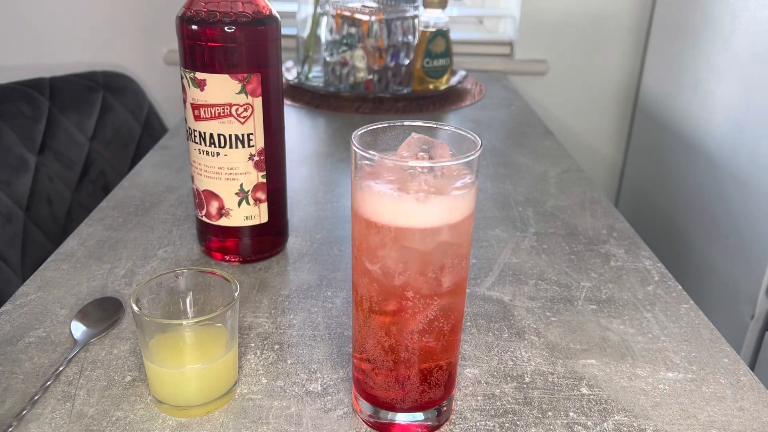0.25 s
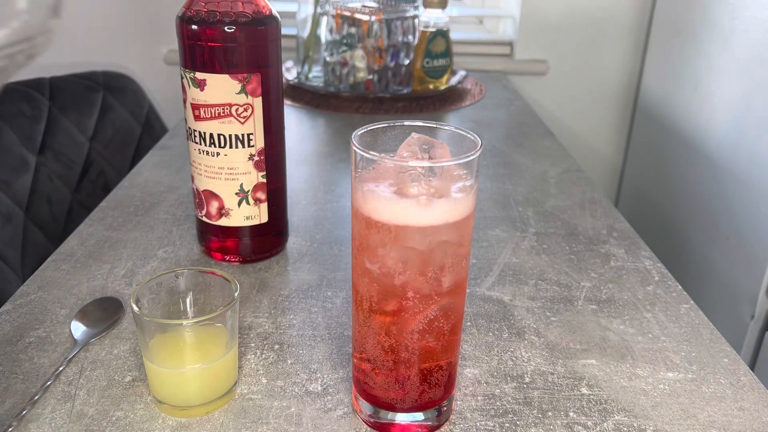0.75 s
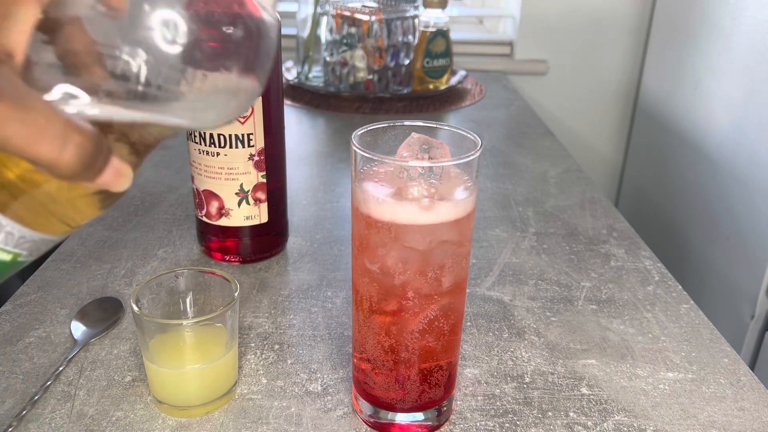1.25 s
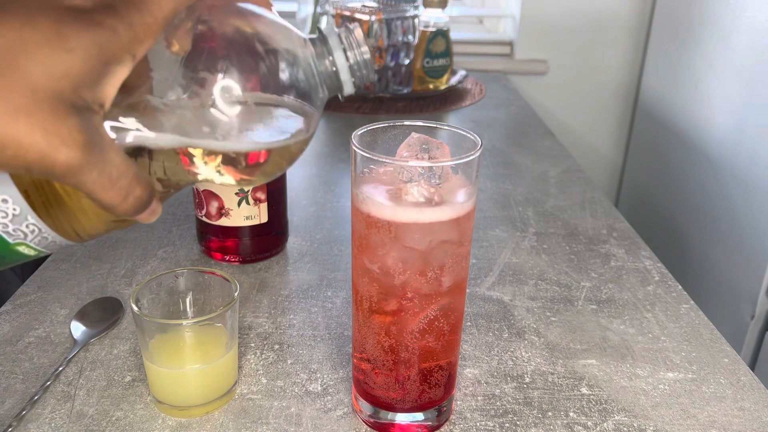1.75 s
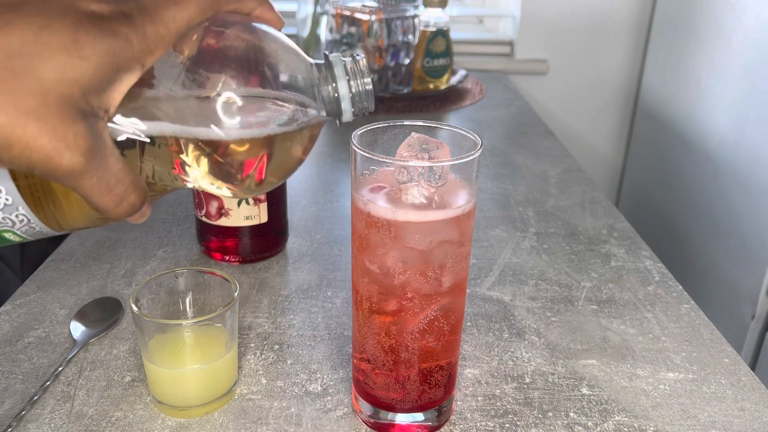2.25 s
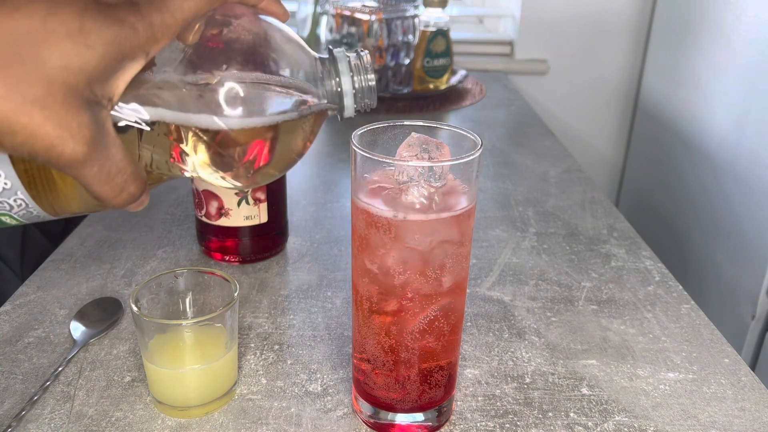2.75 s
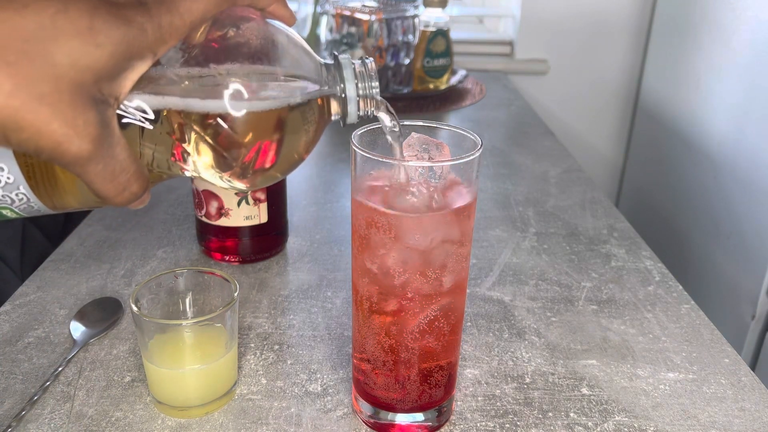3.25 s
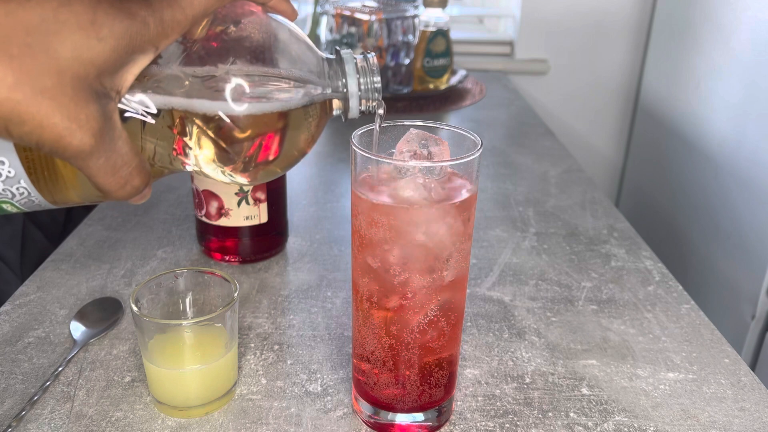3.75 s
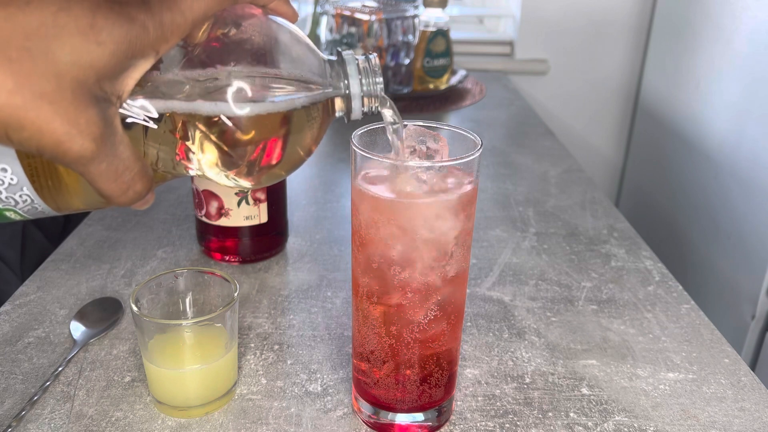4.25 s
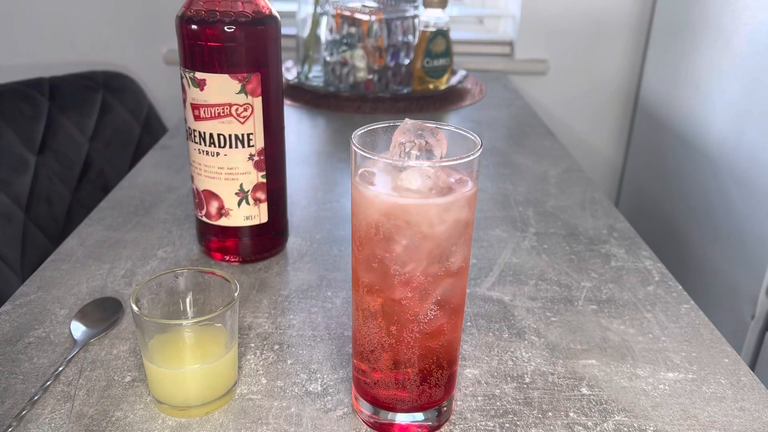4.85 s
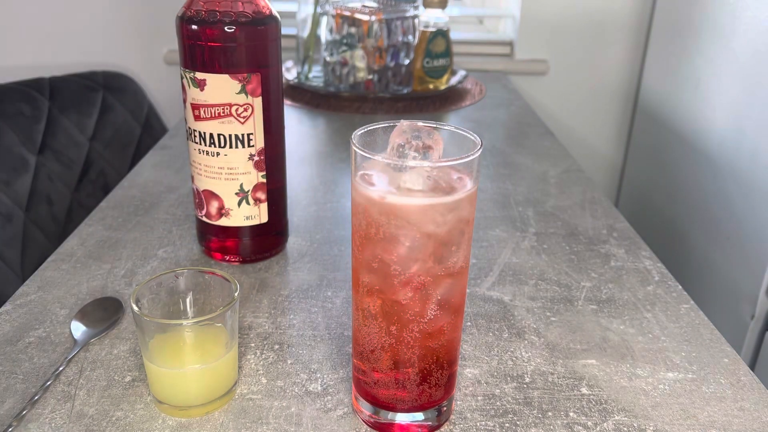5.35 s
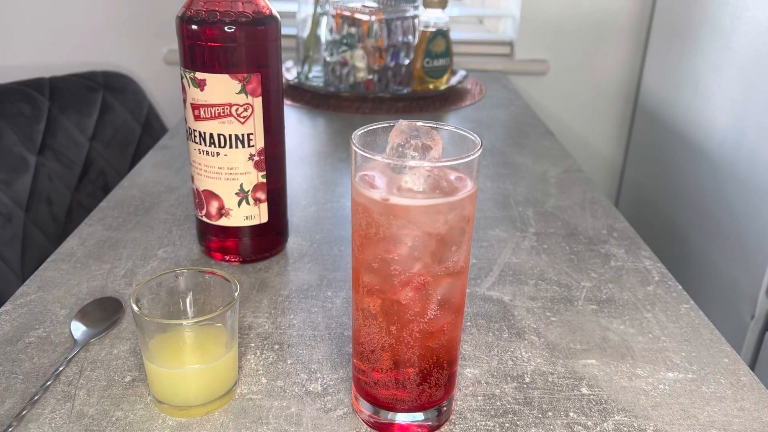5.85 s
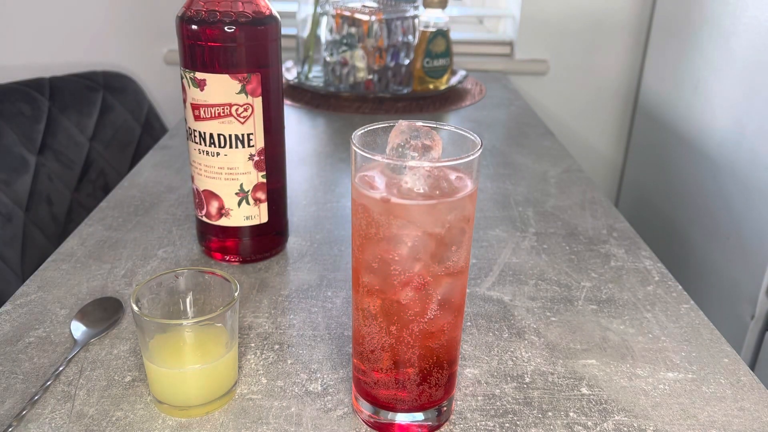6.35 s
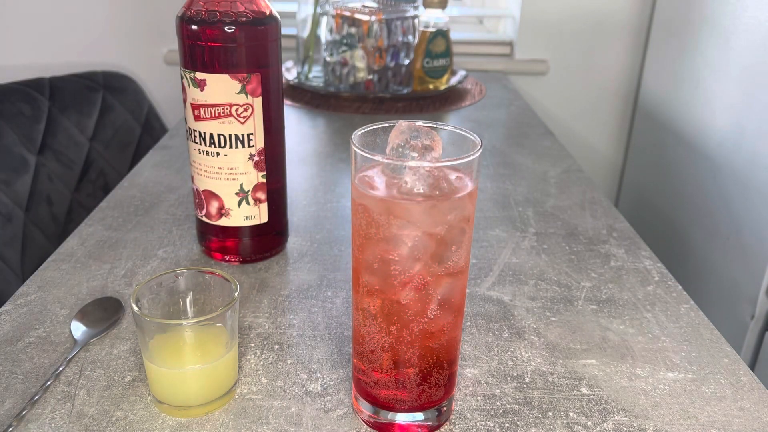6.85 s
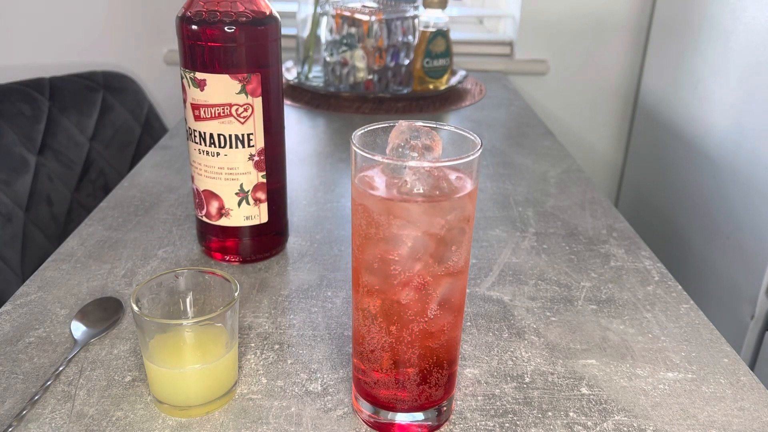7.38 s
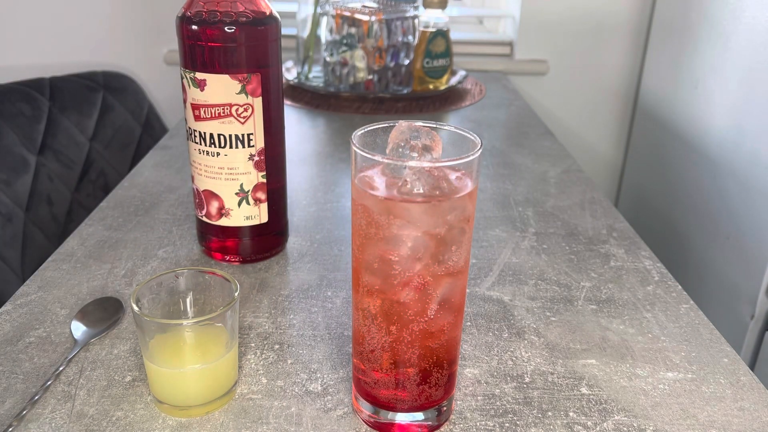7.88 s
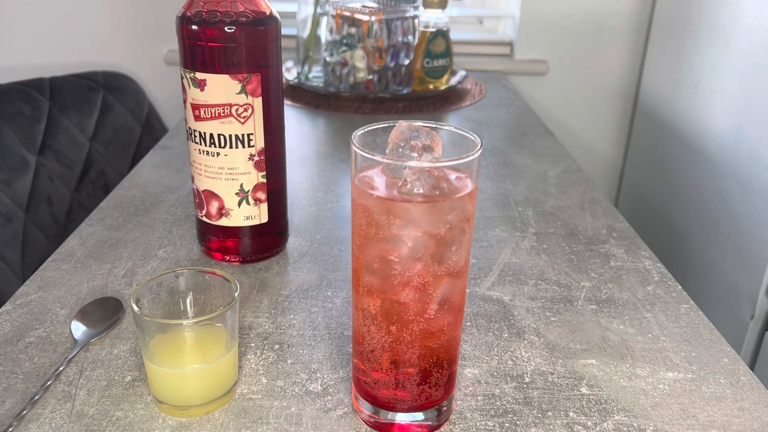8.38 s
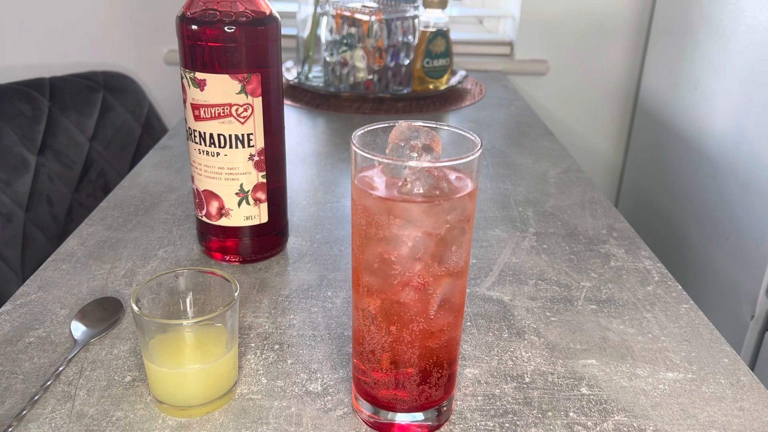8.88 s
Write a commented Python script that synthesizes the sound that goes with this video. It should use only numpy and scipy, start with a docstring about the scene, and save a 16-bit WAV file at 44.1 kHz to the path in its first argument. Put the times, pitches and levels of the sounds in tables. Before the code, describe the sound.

A small kitchen, close stereo microphone, faint fridge hum and low rumble throughout. From 0 to 0.9 s a thin plastic bottle at left crinkles and ticks, with hollow low notes, over already lively fizz. The foam hiss swells to its fullest around 1.5 to 2.5 s, wide and grainy, its brighter part lingering, then sinks. About 3.1 to 3.6 s there are small crackles and quick, quiet bubbly gulps, with a few faint ones up to 4.7 s. Fizz rises again, softer, peaking near 5.2 s and fading slowly. A sharp plastic buckle cracks at 5.3 s, followed by scattered crinkles. From 6.7 s the crackling thickens; knocks at 7.2 to 7.8 s lead to the loudest hard clack at 7.9 s, with more at 8.0, 8.2 and 8.3 s, echoing briefly. Lighter ticks at 8.5 to 8.8 s, then thin residual fizz and hum until about 9.1 s.

```python
"""A fizzy hiss swells and sinks while plastic crackles, rustles and knocks to the left, over hum and rumble.
A drink is poured into a glass on a kitchen counter: random clicks of bursting foam fizz in several pitch bands.
The bottle adds crackles (struck resonances), rustle (dense slips), short clear notes, booms of its air and gulps.
The bottle's crackles, rustle, notes and gulps echo off the walls; one overall tone shapes everything."""
import sys
import numpy as np
from scipy import signal
from scipy.fft import rfft, irfft, next_fast_len
from scipy.io import wavfile
from scipy.ndimage import uniform_filter1d

SR = 44100
rng = np.random.default_rng(int(sys.argv[2]) if len(sys.argv) > 2 else 0)


def to_wav(sig):
    """Store sig (one row per channel, or 1-D mono) as 16-bit WAV at the path in sys.argv[1].

    Samples outside -1..1 are clipped; the rate is SR.
    """
    pcm = np.clip(np.atleast_2d(sig), -1, 1) * 32767
    pcm = np.round(pcm).astype(np.int16)
    wavfile.write(sys.argv[1], SR, pcm.T)  # frames by channels


N = 402191  # length in samples


def gain_of(db):
    """Turns decibels into a factor."""
    return 10 ** (np.asarray(db) / 20)


def evened(x):
    """Scales a sound to an average (RMS) level of 1."""
    return x / np.sqrt(np.mean(x ** 2) + 1e-20)


def peaked(x):
    """Scales a sound to a peak of 1."""
    return x / abs(x).max()


def read(points, hz):
    """Reads a curve between its points, on a pitch scale that is close to logarithmic."""
    point_hz, value = np.transpose(points)
    return np.interp(np.log(hz + 1), np.log(point_hz + 1), value)


def along(rows):
    """Reads a curve over time at every sample."""
    s, value = np.transpose(rows)
    return np.interp(np.arange(N) / SR, s, value)


def shaped(x, response):
    """Filters by a response given as a function of Hz."""
    size = next_fast_len(x.shape[-1] + 4096)
    spectrum = rfft(x, size) * response(np.fft.rfftfreq(size, 1 / SR))
    return irfft(spectrum, size)[..., :x.shape[-1]]


def resonate(x, hz, width):
    """A resonance of gain 1: shifts the pitch hz down to zero, smooths, and shifts back."""
    turn = np.exp(2j * np.pi * np.cumsum(hz * np.ones(x.shape[-1])) / SR)
    r = np.exp(-np.pi * width / SR)
    smooth = signal.lfilter([1 - r], [1, -r], x / turn)
    return 2 * (turn * smooth).real


def pops(per_s, spread_db):
    """Random clicks of either sign, a few of them large."""
    chance = rng.random(N)
    size = np.minimum(rng.exponential(1, N), 5)
    sign = rng.choice([-1., 1.], N)
    return sign * gain_of(spread_db * size) * (chance < per_s / SR)


def swells(full_at, hold, db, rise_s, t60):
    """Summed level of events that rise 20 dB in rise_s up to full_at, hold, and fall 60 dB in t60."""
    t = np.arange(0, N + 16, 16) / SR  # every 16th sample is enough
    since = t - np.array(full_at)[:, None]
    t60 = (np.ones(len(full_at)) * t60)[:, None]
    past_hold = np.maximum(since - np.array(hold)[:, None], 0)
    rise_db = 20 * np.minimum(since, 0) / rise_s
    level = gain_of(np.array(db)[:, None] + rise_db - 60 * past_hold / t60)
    return np.interp(np.arange(N) / SR, t, level.sum(0))


def ports(x, balance, turn):
    """One source at the two ports: a level difference and a phase lead that depend on pitch."""
    def half(hz):
        lead = np.interp(hz, *np.transpose(turn))  # radians
        return gain_of(read(balance, hz) / 2) * np.exp(.5j * lead)
    return np.array([shaped(x, half), shaped(x, lambda hz: 1 / half(hz))])


def spread(a, b):
    """A wide source: a shared part in front and a part that differs between the ports."""
    # how alike the two ports hear it: (pitch [Hz], likeness [0-1 after limiting])
    likeness = [(60, 0.86), (130, 0.65), (290, 0.83), (640, -0.022), (1410, 1), (3100, -0.076),
                (6820, 0.59), (15000, 0.29)]
    # left minus right: (pitch [Hz], level [dB])
    front_db = [(60, 5), (110, 1.5), (200, 5), (380, 2), (700, 2.5), (1290, 2.5), (2380, 0.5), (4400, 7.5),
                (8120, 2.5), (15000, -2)]
    # phase lead of left over right: (pitch [Hz], lead [radians])
    front_turn = [(0, 0), (2580, 0.8), (3190, 2.0), (3960, 0.4), (5250, 7.3), (7750, 7.0), (10900, 2.3),
                  (11500, 0.0), (12700, -0.1), (13200, -3.0), (14400, -3.5), (15600, -7.1)]

    def same(hz):
        return np.clip(read(likeness, hz), 0, .99)

    def apart(hz):
        return np.sqrt(1 - same(hz)) * gain_of(np.outer([.5, -.5], read(front_db, hz)))
    shared = ports(shaped(a, lambda hz: np.sqrt(same(hz))), front_db, front_turn)
    return shared + shaped(b, apart)


def foam():
    """Fizz of bursting foam in several pitch bands, as the glass's air might ring, with little bass."""
    # bands lowest, second, third, fourth, fifth, widest treble, broad; curves below move the first three:
    # (pitch [Hz], width of each filter pass [Hz], clicks [per s], steady fizz before it goes flat [dB])
    bands = [(1950, 925, 7500, -79), (3240, 1200, 8300, -72), (5150, 860, 12000, -70),
             (6530, 530, 14000, -74), (8360, 1100, 20000, -66), (12960, 19000, 28000, -70.5),
             (3880, 7300, 29000, -73)]
    # heads of foam that swell and sink: (peak time of the lowest band [s], delay [s per octave of pitch],
    # time to swell 6 dB [s], time to sink 6 dB [s], peak level of each band [dB])
    heads = [(0.2, 0.51, 1, 0.8, (-58.5, -61, -88, -73, -85, -67, -58)),
             (1.75, 0.85, 0.8, 0.82, (-50.5, -58, -62.5, -69.5, -65.5, -56.5, -58)),
             (5.2, 0.03, 0.85, 1.17, (-59, -60.5, -65.5, -87, -76.5, -67, -50.5))]
    # pitch of the lowest band: (time [s], pitch [Hz])
    lowest_hz = [(0, 1870), (.6, 1650), (1.3, 1450), (1.9, 1660), (2.5, 1740), (3.7, 1950), (9.12, 1990)]
    # pitch of the second band: (time [s], pitch [Hz])
    second_hz = [(0, 3500), (1.0, 3300), (1.7, 3100), (2.7, 3400), (3.7, 3550), (4.6, 3500), (9.12, 3500)]
    # pitch of the third band: (time [s], pitch [Hz])
    third_hz = [(0, 5300), (2.2, 5300), (2.7, 5200), (3.3, 5430), (9.12, 5460)]
    # change of the steady fizz: (time [s], level [dB])
    going_flat = [(0, 0.5), (6.3, 6.5), (6.95, -3), (7.5, -3.5), (9.12, -11)]
    # part of the fizz that reaches lower: (time [s], share [0-1])
    deeper_share = [(0, 0.7), (1.0, 1), (1.5, 0.86), (2.3, 0), (3.1, .03), (4.3, 0.2), (5.2, 0.46),
                    (9.12, .2)]

    t, flat_db = np.arange(N) / SR, along(going_flat)
    moving_hz = [along(curve) for curve in (lowest_hz, second_hz, third_hz)]
    out = np.zeros((3, N))  # three independent layers, for width
    for k, (hz, width, per_s, steady_db) in enumerate(bands):
        octaves = np.log2(hz / bands[0][0])
        power = gain_of(steady_db + flat_db) ** 2
        for peak_s, lag, swell_s, sink_s, peak_db in heads:
            late = t - peak_s - lag * octaves
            bell_db = -6 * (late / np.where(late < 0, swell_s, sink_s)) ** 2
            power += gain_of(peak_db[k] + bell_db) ** 2
        if k < len(moving_hz):
            hz = moving_hz[k]
        # the difference between samples favours treble
        clicks = np.diff([pops(per_s, 3.2) for _ in out], prepend=0)
        fizz = evened(resonate(resonate(clicks, hz, width), hz, width))
        # patches of foam burst together
        seethe = evened(uniform_filter1d(rng.standard_normal(N), size=3000))
        out += np.sqrt(power) * gain_of(0.58 * seethe) * fizz

    def above(edge_hz):
        return shaped(out, lambda hz: 1 / np.sqrt(1 + (edge_hz / (hz + 1)) ** 12))
    deeper = np.clip(along(deeper_share), 0, 1)
    out = deeper * above(800) + (1 - deeper) * above(1260)  # bass cuts, Hz
    return spread(out[0], out[1:])


def kitchen():
    """Steady room noise, low rumble that comes and goes, and a wavering fridge hum."""
    # colour of the room noise, before its overall level is set: (pitch [Hz], level [dB per Hz])
    room_tone = [(15, -48), (25, -21), (53, 6), (72, -12), (205, -6), (242, -8.5), (393, -15.5),
                 (573, -21.5), (711, -22.5), (836, -22.5), (1100, -28.5), (1600, -23.5), (7660, -26),
                 (10600, -58), (14600, -23.5), (15900, -50.5)]
    # steps and shakes of the counter: (time at full level [s], level [dB])
    shakes = [(.02, -45.5), (.35, -52.5), (.84, -56), (1.17, -55), (1.38, -71), (1.55, -62), (2.94, -61),
              (3.89, -60), (4.58, -53.5), (5.05, -51), (5.32, -44), (5.41, -60), (5.56, -54.5),
              (5.76, -52.5), (6.1, -57), (6.4, -53.5), (6.73, -59.5), (7.21, -49.5), (7.34, -45),
              (7.57, -52.5), (7.92, -45.5), (8.05, -50.5), (8.23, -69), (8.66, -45), (8.76, -58)]
    # fridge tones, before the swelling below: (pitch [Hz], level [dB], width of the waver [Hz])
    hum = [(99, -70.5, 2.8), (199.5, -68, 4.7)]
    # the hum swells and dips: (time [s], level [dB])
    hum_level = [(0, 3), (.9, -0.5), (1.2, -1.5), (2.0, 1.5), (2.5, -12.5), (2.9, 2), (3.7, -3.5),
                 (4.1, -4), (4.5, 1), (6, -0.5), (8.2, -4), (9.12, -4.5)]

    air, shake, buzz = rng.standard_normal((3, 3, N))
    out = gain_of(-63) * evened(shaped(air, lambda hz: gain_of(read(room_tone, hz))))
    s, db = np.transpose(shakes)
    steady = gain_of(-67.5)
    level = steady + swells(s, 0 * s, db, rise_s=0.063, t60=0.47)
    out += level * evened(resonate(resonate(shake, 64, 110), 80, 280))
    swell_db = along(hum_level)
    for hz, db, width in hum:
        tone = np.sqrt(2) * np.sin(2 * np.pi * hz * np.arange(N) / SR)
        waver = 0.67 * evened(resonate(buzz, hz, width))
        out += gain_of(db + swell_db) * (tone + waver)
    return spread(out[0], out[1:])


def rustle():
    """Dense small slips of skin on plastic: a body coloured by the bottle and a thin squeaky top."""
    # the hand drags and twists the plastic:
    # (time at full level [s], hold [s], level [dB], time to fall 60 dB [s], treble relative to the body [dB])
    drags = [(0.029, .003, -51, 0.21, -1), (0.115, 0.0035, -54.5, 0.1, 2), (0.15, 0.24, -69, 0.18, 1),
             (0.364, 0.11, -61, 0.14, 4), (0.506, 0.032, -59, .05, 5), (0.547, .002, -44, 0.14, -7),
             (0.882, 0.0022, -62, 0.36, 11), (3.22, .003, -59, 0.53, -25), (3.317, 0.03, -57, 0.16, -25),
             (5.042, 0.074, -54, 0.091, -13), (5.338, 0.0018, -35.5, 0.045, -4),
             (5.342, 0.023, -73, .05, 4), (5.385, .003, -60, 0.097, -6), (5.509, 0.047, -49.5, 0.13, -18),
             (5.567, 0.0039, -38, 0.042, -29), (5.665, 0.0023, -48, 0.078, -9), (5.695, 0.063, -63, .1, -3),
             (5.753, 0.097, -62, 0.11, -15), (5.93, .004, -53.5, .12, -10),
             (6.055, 0.011, -56.5, 0.068, -18), (6.08, 0.0018, -50, 0.026, -27), (6.093, .04, -74, .1, -15),
             (6.237, 0.026, -65, .1, -15), (6.311, .005, -52, 0.16, -19), (6.424, .004, -53.5, 0.19, -18),
             (6.684, 0.004, -43, 0.08, -25), (6.745, .003, -49, 0.086, -21),
             (7.013, 0.036, -57.5, 0.15, -27), (7.076, 0.1, -58, 0.09, -9), (7.198, 0.008, -44, 0.065, -15),
             (7.313, .004, -41.5, 0.36, -18.5), (7.399, 0.0034, -43.5, 0.15, -10),
             (7.541, 0.002, -43, 0.059, -12), (7.561, 0.0026, -34.5, 0.059, -16),
             (7.674, 0.0033, -50.5, 0.25, -15), (7.736, 0.1, -48, 0.28, -28.5),
             (7.916, 0.0072, -37, 0.15, 7.5), (7.996, 0.0044, -25, 0.22, -19.5),
             (8.08, 0.0036, -43.5, 0.17, -33), (8.215, .003, -31.5, 0.27, -17),
             (8.28, 0.012, -29.5, 0.086, -26), (8.309, 0.0032, -22.5, 0.049, -29.5),
             (8.4, .09, -68, 0.091, 7), (8.524, 0.07, -58.5, 0.059, 2.5), (8.628, 0.0022, -38, 0.082, -8),
             (8.642, 0.021, -55, 0.077, -11), (8.688, 0.061, -61, 0.15, -3)]
    # colour of the body, before it is evened: (pitch [Hz], level [dB per Hz])
    body_tone = [(30, -70.5), (100, -31), (500, -10), (1200, 1.5), (2200, -1.5), (3300, -3), (4200, -14),
                 (6000, -17), (16000, -71.5)]

    clumps = evened(uniform_filter1d(rng.standard_normal(N), size=260))
    slips = pops(5000, 3.2) * gain_of(2.5 * np.clip(clumps, -2, 2))  # slips come in clumps
    body = evened(shaped(slips, lambda hz: gain_of(read(body_tone, hz))))
    top = evened(resonate(resonate(slips, 7900, 4100), 4800, 4100))
    s, hold, db, t60, top_db = np.transpose(drags)
    grip_s = 0.008  # a drag sets in
    body_level = swells(s, hold, db, grip_s, t60)
    top_level = swells(s, hold, db + top_db, grip_s, t60)
    return body_level * body + top_level * top


def cracks():
    """Each buckle of the wall: a snap and a crunch of slips after it ring broadly, with a thud and an edge."""
    # crackles and knocks of the bottle, the last three relative to the ringing at the main pitch or the body:
    # (time [s], level of the body's peak [dB], pitch [Hz], thud under the body [dB],
    # sharp edge on the body [dB], whole wall beside the main ringing [dB])
    buckles = [(0.03, -31.5, 4400, -34, -7, -6), (0.047, -40, 1900, 2, -10, 4),
               (0.1093, -42, 2100, 2, -11, -3), (.367, -36, 6500, -14, -10, -6),
               (0.5016, -22.5, 7950, -18, -15, -4), (0.519, -39, 3500, -28, 9, -5),
               (0.5459, -26, 4190, -10, 3, -3), (.714, -37, 1550, -39, -25, -23),
               (0.7623, -44.5, 2190, 0.5, -8, -1), (0.869, -40, 6000, -10, 11, 1),
               (0.875, -33.5, 4820, -4, 20.5, 2), (3.117, -46.5, 1770, -32, -9, -11),
               (3.2137, -36, 1950, -22, -17, -14), (3.263, -44, 1720, -6, -12, -7),
               (3.278, -45, 1670, -3, -12, -7), (3.316, -37, 1890, -3, -15, -16),
               (3.345, -43.5, 1790, 1.5, -18, -11), (3.3652, -35.5, 1580, -4, -18, -14),
               (3.4576, -39.5, 2840, -13, -15, -4), (3.558, -51, 1900, -26, -10, -4),
               (3.632, -46, 3800, -22, -10, -5), (4.03, -62, 2000, -7, -10, 5),
               (4.389, -50, 4700, -4, 13.5, 3), (4.4477, -50, 497, 8.5, -25, 14),
               (4.755, -48, 476, 10, -25, -12), (4.981, -36.5, 3550, -1.5, 3.5, -8),
               (5.043, -33.5, 4690, -19, 5, 6), (5.079, -54, 1300, -15, -15, 2),
               (5.0654, -38, 1730, -20, -10, -3), (5.1066, -27.5, 2000, -37, -22, 12),
               (5.2995, -29.5, 1960, -11, -18, -6), (5.3215, -8, 4060, -32, -14, 12),
               (5.3291, -13, 4840, -14, -6, 14), (5.3323, -18.5, 1890, -10, -20, -3),
               (5.3694, -18, 2500, -5, -11, 2), (5.3761, -17, 2400, -17, -2, -3),
               (5.468, -43.5, 4680, 1, -14, 5), (5.5164, -35, 2200, 1.5, -25, -8),
               (5.5227, -28, 2200, -7, -22, -15), (5.5607, -33, 2120, 2.5, -15, -8),
               (5.5657, -30, 2200, -5, -15, -5), (5.57, -26, 2390, -6, 1.5, -12),
               (5.572, -33, 2300, -8.5, -10, 1), (5.6636, -24, 1920, -9, -12, -2),
               (5.7496, -35.5, 1880, -6, -15, 5), (5.82, -50, 1300, -1, -20, 4),
               (5.924, -44.5, 2200, -2, -10, -11), (6.07, -37.5, 1900, 1, -20, 12),
               (6.0777, -30.5, 1960, -4, -20, -1), (6.29, -46, 1690, -11, -15, 2),
               (6.313, -40, 1910, -18, -18, -12), (6.319, -39.5, 2300, -5, -15, -2),
               (6.329, -43, 1800, -1, -18, 0), (6.428, -41, 1500, -6, -12, 8),
               (6.4324, -36, 1870, -18, -16, -16), (6.578, -37.5, 1800, -12, -8, 3),
               (6.6025, -39.5, 1620, -32, -18, -3), (6.678, -40, 1860, -7, -27, -5),
               (6.688, -38, 2200, -6, -22, -9), (6.6999, -23, 2280, -9, -22, -23),
               (6.6959, -24, 1860, -2.5, -22, -29), (6.7098, -37, 3240, 0, -9, -8),
               (6.737, -27.5, 2190, -11, -9, -16), (6.746, -42, 2600, -22, -12, 3),
               (6.756, -40, 2000, -7, -20, 0), (6.8159, -45.5, 1830, -4, -14, -5),
               (6.937, -36, 1810, -14, -12, 4), (7.03, -41, 2140, -6, -7, -13),
               (7.0826, -32, 2320, -5.5, -18, 2), (7.09, -34, 2150, -22, -22, -8),
               (7.094, -35, 2310, -5, -20, -6), (7.098, -31, 1580, -6.5, -26, -18),
               (7.105, -42, 1380, -14, -22, -3), (7.1377, -30.5, 2120, -6.5, -31, -24),
               (7.151, -36, 1700, -15, -23, -7), (7.171, -38, 2480, -2, -18, -9),
               (7.192, -19.5, 2540, -6, -12, -7), (7.206, -46, 2900, -5, -20, 2),
               (7.315, -26.5, 2300, -17, -9, 13), (7.318, -20, 2260, -33, -9, 0),
               (7.3277, -18.5, 1900, -8.5, -34, 2), (7.334, -22, 4000, -20, -30, 10),
               (7.3708, -23, 2160, -7.5, -20, 18), (7.4006, -19.5, 2500, -17.5, -34, 2),
               (7.4083, -20.5, 2490, -8.5, -29, -16), (7.434, -23, 2420, -12, -6, 4),
               (7.5267, -22, 1830, -18.5, -14, -3), (7.546, -27, 1920, -9, -8, 7),
               (7.558, -13, 2037, -15, -16, 2.5), (7.684, -39.5, 2110, -24, -19, -7),
               (7.6918, -27.5, 2080, -13.5, -18.5, 1), (7.7354, -25.5, 2180, -9, -22, 3),
               (7.748, -27.5, 1970, -32, -27, -5), (7.7553, -22, 2027, -14, -36, 0),
               (7.7821, -23, 2040, -10.5, -37, -19), (7.816, -36, 2380, -6, -19.5, -2),
               (7.8465, -38.5, 1920, 4, -33.5, -3), (7.8989, -22, 2410, -19.5, -18, 0),
               (7.9061, -3.5, 3850, -27, -2.5, 15), (7.9082, 2.5, 2200, -24.5, -27, 26.5),
               (7.9858, -21.5, 2810, -8, -19, -3), (7.9983, -21.5, 2160, -24, -27.5, 4),
               (8.0057, -10, 2200, -26.5, -21.5, 3.5), (8.0192, -19, 2180, -12, -21, -7),
               (8.0284, -15.5, 2210, -27.5, -33, -7.5), (8.0822, -24.5, 2340, -10.5, -34.5, 2),
               (8.116, -39.5, 2100, -29.5, -24.5, -9), (8.125, -32, 2126, -8, -26, -11),
               (8.2134, -7, 2900, -16.5, -26.5, 11), (8.234, -27, 2313, -16, -22.5, 5),
               (8.2667, -19.5, 2003, -9.5, -26.5, -9), (8.2838, -20, 2110, -22, -22.5, -10),
               (8.2866, -21.5, 5280, -25, -8, -4.5), (8.2937, -23, 2325, -17.5, -26, -6),
               (8.301, -18.5, 2100, -26.5, -25, -2), (8.3039, -6, 2000, -26, -27, 0),
               (8.3084, -14.5, 1930, -38.5, -12, 20), (8.3118, -10.5, 1780, -26, -31, 15),
               (8.3139, -18.5, 1900, -37, -25.5, 13), (8.329, -36, 1300, -17.5, -25, -5),
               (8.338, -32, 1100, -16, -25, 3), (8.379, -41, 1700, -15, -20, 0),
               (8.416, -44.5, 2000, -15, -17, 5), (8.5165, -31, 5470, -36, -23, -4),
               (8.5322, -40, 2880, -35, 6, -14), (8.6241, -33, 1500, -21, -10, -10),
               (8.6272, -22, 2580, -5.5, 2, 0), (8.634, -44, 2500, -17, -15, 0),
               (8.6424, -27, 5200, -13, -17, -9), (8.6532, -24.5, 2000, -21, -17, 4),
               (8.667, -35, 1610, -21, 10, 2), (8.717, -43, 1280, -18, 14.5, 3),
               (8.752, -53, 1303, 13, -14, 3), (8.831, -40, 5270, -50, -2, -19),
               (9.077, -51, 4260, -19, 4, 10)]
    # resonances of the bottle wall: (pitch [Hz], width of the first pass [Hz], level before width scaling [dB])
    shell_modes = [(1083, 210, -4), (2200, 1000, 1), (3500, 2470, 3.5), (5930, 470, -12)]

    t = np.arange(2600) / SR
    snap = t == 0
    out = np.zeros(N + len(t))
    noise = rng.standard_normal((len(buckles), 3, len(t)))
    low = signal.butter(2, (150, 1000), "band", fs=SR)
    for (s, db, hz, weight_db, edge_db, wall_db), (a, b, c) in zip(buckles, noise):
        fade = t / 0.0021  # the crunch dies within a few ms
        jolt = snap + gain_of(-19.5) * a * abs(c) * np.exp(-fade)
        # widths as shares of the pitch
        ring = resonate(resonate(jolt, hz, 0.28 * hz), hz, 0.55 * hz)
        shell = np.zeros(len(t))
        for mode_hz, width, mode_db in shell_modes:
            mode = resonate(resonate(jolt, mode_hz, width), mode_hz, 2.4 * width)
            shell += gain_of(mode_db) * mode / np.sqrt(width)
        thud = signal.lfilter(*low, snap + 0.31 * b * np.exp(-fade / 2.65))
        edge = resonate(resonate(jolt, 7150, 5260), 9100, 7800)
        click = resonate(resonate(jolt, 6200, 900), 4300, 1800)
        sound = peaked(peaked(ring) + gain_of(wall_db) * peaked(shell))
        sound += gain_of(weight_db) * peaked(thud)
        sound += gain_of(edge_db) * peaked(edge)
        sound += gain_of(-35) * peaked(click)
        out[round(s * SR):][:len(t)] += gain_of(db) * sound
    bass_cut = signal.butter(3, 120, "high", fs=SR, output="sos")
    return signal.sosfilt(bass_cut, out[:N])


def pings():
    """Each taut patch of wall swells for a moment at one pitch and is damped again by the hand."""
    # short clear notes, low ones from the bottle's base:
    # (start [s], peak level [dB], pitch [Hz], length [s])
    patches = [(.04, -50, 500, 0.033), (.105, -54, 350, 0.033), (0.546, -49, 400, 0.027),
               (.752, -50, 480, 0.027), (.87, -50, 518.4, 0.03), (8.522, -50, 249, 0.014),
               (8.765, -53, 1160, .012), (.5, -35, 3170, 0.0032), (0.5004, -28.5, 7900, 0.0038),
               (0.505, -40, 7900, 0.0097), (0.546, -37, 5020, 0.0048), (0.547, -34, 1150, 0.0036),
               (0.542, -46, 2120, .004), (0.715, -34, 1640, 0.0054), (3.35, -52, 1500, 0.0039),
               (3.384, -48, 1550, 0.0044), (5.306, -47, 2000, .006), (5.321, -16, 2300, 0.0034),
               (5.323, -28, 4200, 0.0067), (5.333, -24.5, 680, 0.0061), (5.34, -43, 2500, .005),
               (5.388, -38, 2540, .008), (5.569, -37, 195, 0.018), (7.194, -45, 207, 0.025),
               (7.314, -40, 255, 0.018), (7.817, -42.5, 353, 0.013), (7.908, -36.5, 150, 0.02),
               (7.43, -46.5, 167, .03), (7.33, -38.5, 161, .03), (7.905, -9.5, 2530, 0.0045),
               (7.906, -10, 2177, .007), (7.905, -13.5, 1390, 0.0046), (7.906, -11, 2940, 0.0036),
               (7.903, -21, 6470, 0.0037), (7.955, -31, 3730, 0.0092), (7.987, -22.5, 2480, .005),
               (8.0035, -11, 2150, 0.007), (8.026, -19.5, 1880, 0.0032), (8.029, -23, 2300, .007),
               (8.214, -4.5, 2390, 0.0022), (8.22, -24.5, 2650, 0.0055), (8.237, -32, 2740, .005),
               (8.259, -26, 610, 0.0046), (8.288, -24, 2360, 0.004), (8.302, -20, 2000, 0.0048),
               (8.307, -29, 4220, 0.0064), (8.31, -19, 1880, 0.0069), (8.631, -45, 216, 0.01),
               (8.658, -43, 201, 0.013), (8.74, -46, 354, 0.0094)]

    out = np.zeros(N)
    for s, db, hz, length in patches:
        t = np.arange(0, length, 1 / SR)
        swell = np.sin(np.pi * (t / length) ** 0.83) ** 2
        out[round(s * SR):][:len(t)] += gain_of(db) * swell * np.sin(2 * np.pi * hz * t)
    return out


def booms():
    """Handling shakes the air in the bottle at its one low, slightly drifting note, with a weak overtone."""
    # (time at full level [s], hold [s], level [dB], pitch [Hz])
    handling = [(0.055, 0.04, -43, 268.5), (0.135, 0.045, -55, 268.6), (0.396, 0.082, -58, 275),
                (0.562, 0.0068, -52.5, 263.3), (0.762, 0.0094, -49, 263.6), (0.839, 0.03, -54, 264.6),
                (0.877, 0.016, -51, 262), (3.29, .01, -68, 255), (4.759, 0.0084, -53, 259.1),
                (4.988, 0.017, -50, 258.5), (5.052, 0.057, -48.5, 256.6), (5.334, 0.035, -37.5, 257)]

    s, hold, db, note = np.transpose(handling)
    hz = along(np.transpose([s, note]))
    phase = 2 * np.pi * np.cumsum(hz) / SR
    fuzz = evened(resonate(rng.standard_normal(N), hz, 8.2))
    tone = 1.06 * np.sin(phase) + 0.46 * fuzz + 0.067 * np.sin(2 * phase)
    return swells(s, hold, db, rise_s=0.032, t60=0.23) * tone


def gulps():
    """Air gulps into the neck as the drink runs out: each bubble rings briefly, climbing in pitch as it rises."""
    # (time [s], level at the start of the decay [dB], starting pitch [Hz])
    neck_bubbles = [(3.238, -50, 820), (3.265, -53, 610), (3.293, -36.5, 600), (3.303, -40, 640),
                    (3.356, -40, 635), (3.615, -53, 816), (3.868, -52, 605), (4.39, -66, 900),
                    (4.448, -63, 623), (4.756, -63, 560)]

    t, out = np.arange(3000) / SR, np.zeros(N)
    t60 = 0.028  # s
    climb = 4.4  # share of the starting pitch gained per s
    onset = 1 - np.exp(-t / 0.00056)
    for s, db, hz in neck_bubbles:
        ring = np.sin(2 * np.pi * hz * t * (1 + climb * t / 2)) * onset
        out[round(s * SR):][:len(t)] += gain_of(db - 60 * t / t60) * ring
    return out


def walls(x):
    """Echoes: sparse taps of random sign, each band dying at its own speed; three tails take turns."""
    # how fast the echoes die: (pitch [Hz], time to fall 60 dB [s])
    decay = [(200, 0.25), (1000, 0.27), (1800, 0.22), (3000, 0.23), (8000, 0.28), (16000, 0.18)]

    taps = np.zeros((3, 2, 16000))  # tail, port, sample
    at = np.arange(260, 15960, 20) + rng.integers(0, 20, (3, 2, 785))
    np.put_along_axis(taps, at, rng.choice([-1., 1.], at.shape), 2)
    hz, t, bands = signal.stft(taps, SR, nperseg=128)
    fading = bands * gain_of(-60 * t / read(decay, hz)[:, None])
    tails = signal.istft(fading, SR, nperseg=128)[1]
    tails = tails / np.linalg.norm(tails[0, 0])
    # the feed to each tail follows a 37 Hz cosine, a third of a cycle apart
    phase = 2 * np.pi * (37 * np.arange(N) / SR + np.arange(3)[:, None] / 3)
    feeds = np.sqrt(2 / 3) * np.cos(phase) * x
    return signal.oaconvolve(feeds[:, None], tails, axes=2).sum(0)[:, :N]


def scene():
    """Places the bottle at the left with its echoes, and the foam and kitchen wide in front."""
    # left minus right for the bottle: (pitch [Hz], level [dB])
    left_db = [(60, 1.5), (110, 9), (200, 7.5), (380, 1.5), (700, 6), (1290, 14), (2380, 3.5), (3300, 6.5),
               (4400, 13.5), (8120, 4), (15000, -2.5)]
    # phase lead of left over right for the bottle: (pitch [Hz], lead [radians])
    left_turn = [(0, 0), (2930, 8.6), (4390, 7.2), (5770, 8.3), (8100, 6.5), (10600, 2.7), (11500, 0.2),
                 (12700, -0.3), (13300, -3.0), (14500, -3.3), (15000, -6.3), (15600, -6.2)]

    wide = foam() + kitchen()
    bottle = rustle() + cracks() + gulps()
    notes = pings()
    near = ports(bottle + notes, left_db, left_turn)
    near += booms() * gain_of([[2.5], [-2.5]])
    echoes = gain_of([[-6], [-8.5]]) * walls(bottle + gain_of(-2.5) * notes)
    return near + echoes + wide


def record(dry):
    """One overall tone, a ceiling on the peaks, then the band limit."""
    # overall tone: little bass, a deep dip near 10 kHz and a mild one near 14 kHz: (pitch [Hz], level [dB])
    tone = [(15, -30), (45, -8), (100, -4), (9000, 1.5), (9700, -0.5), (10300, -38), (11200, 2.5),
            (12800, -5.5), (13700, -9.5), (14600, -4), (16000, -2)]

    heard = shaped(dry, lambda hz: gain_of(read(tone, hz)))
    heard = np.clip(heard, -1, 1)
    band_limit = signal.firwin(511, 16050, window=("kaiser", 9), fs=SR)  # edge in Hz
    return signal.oaconvolve(heard, band_limit[None], "same")


dry = scene()
out = record(dry)
to_wav(out)
```